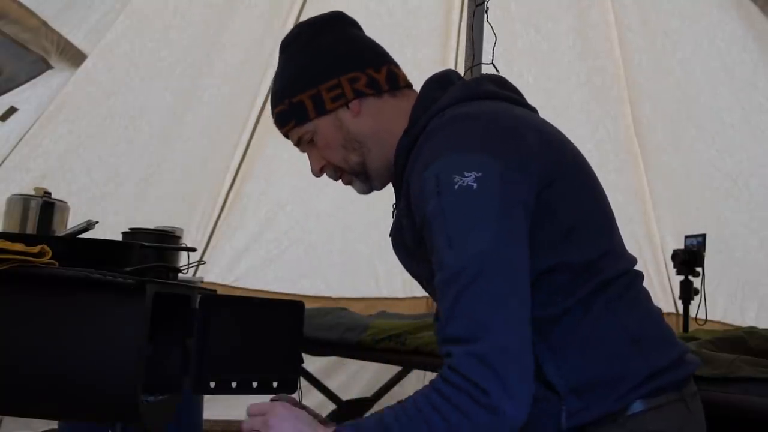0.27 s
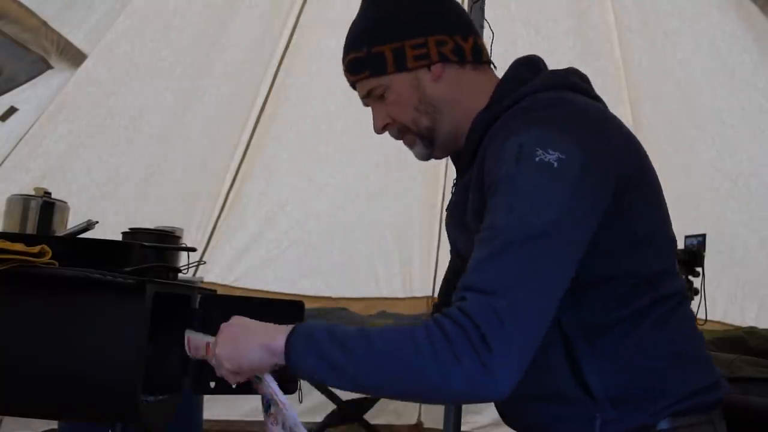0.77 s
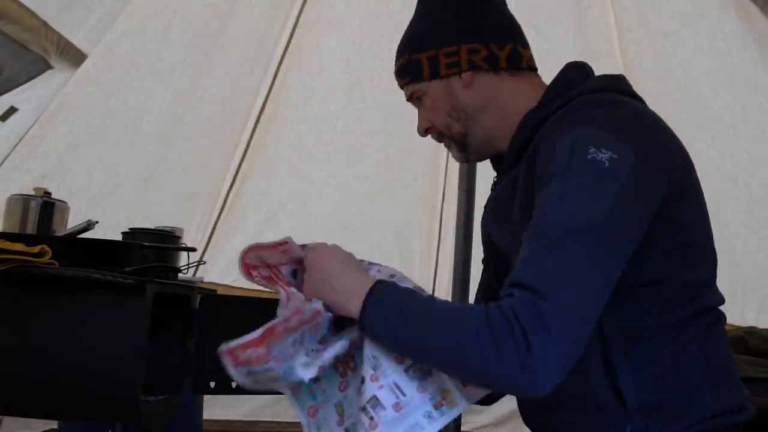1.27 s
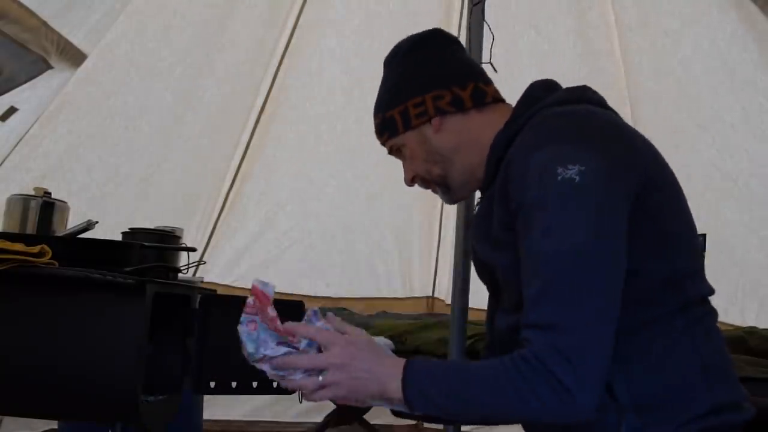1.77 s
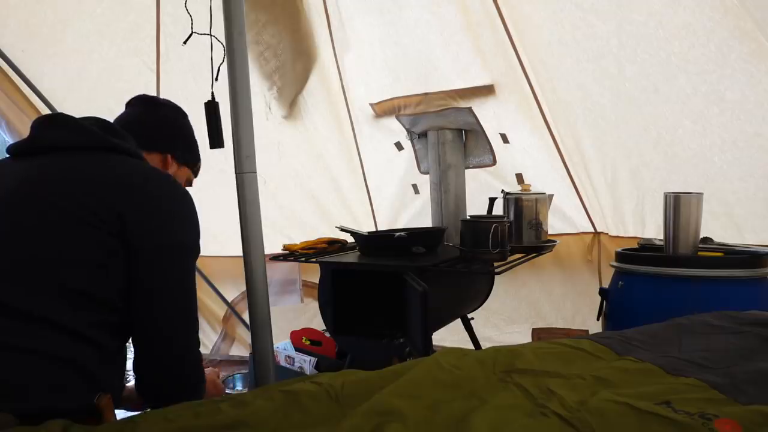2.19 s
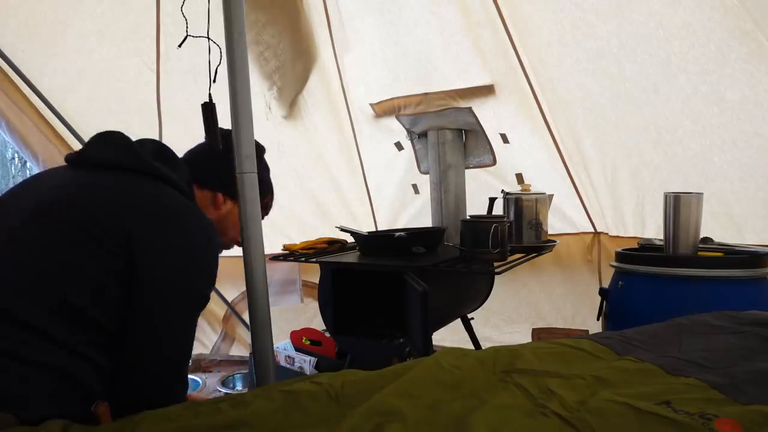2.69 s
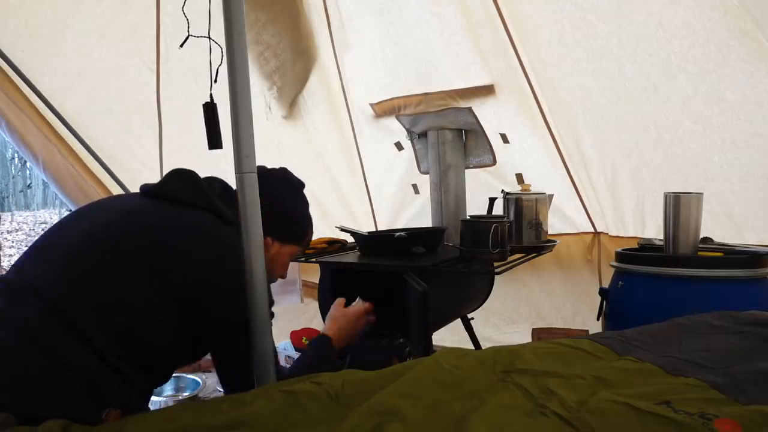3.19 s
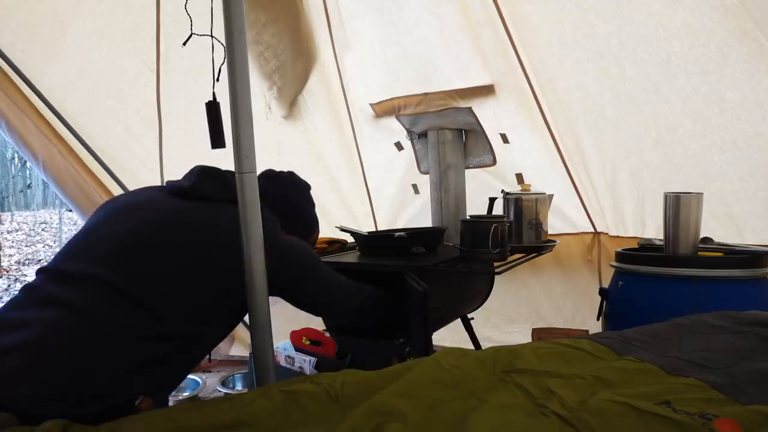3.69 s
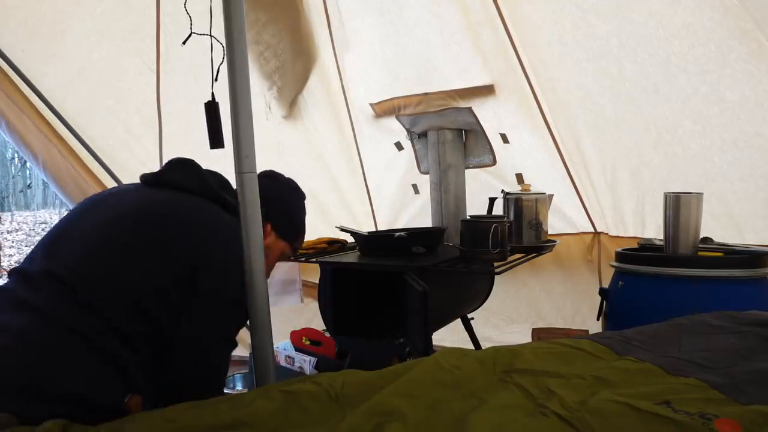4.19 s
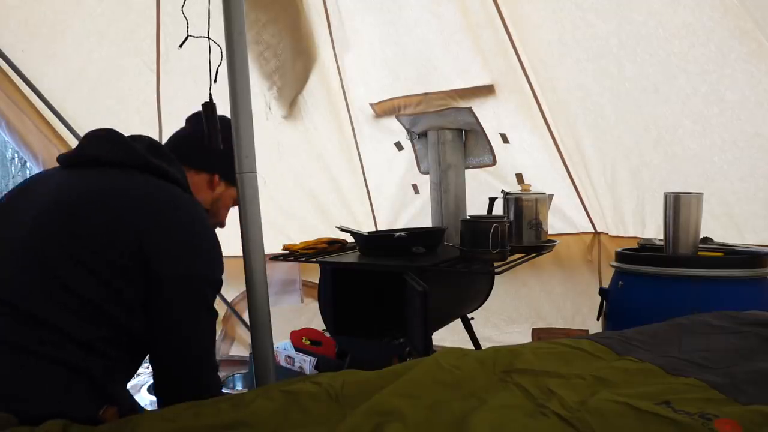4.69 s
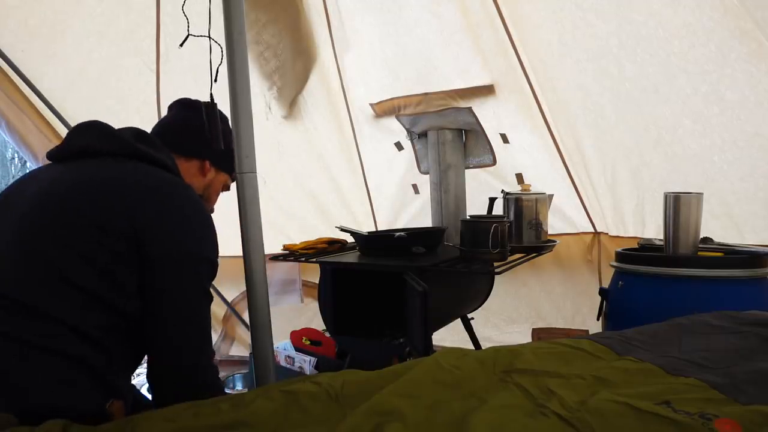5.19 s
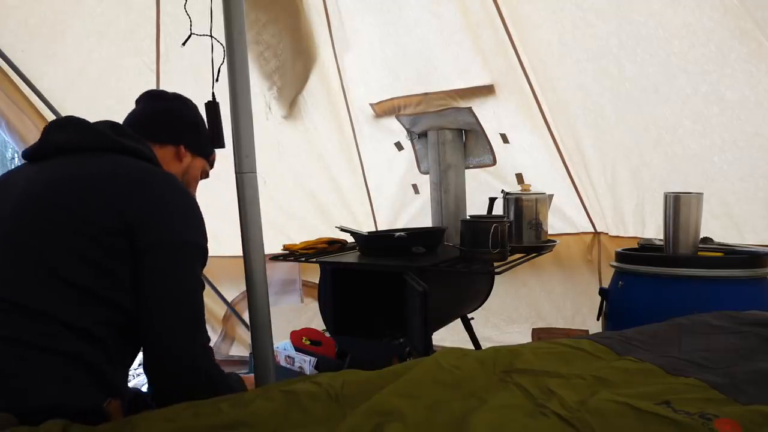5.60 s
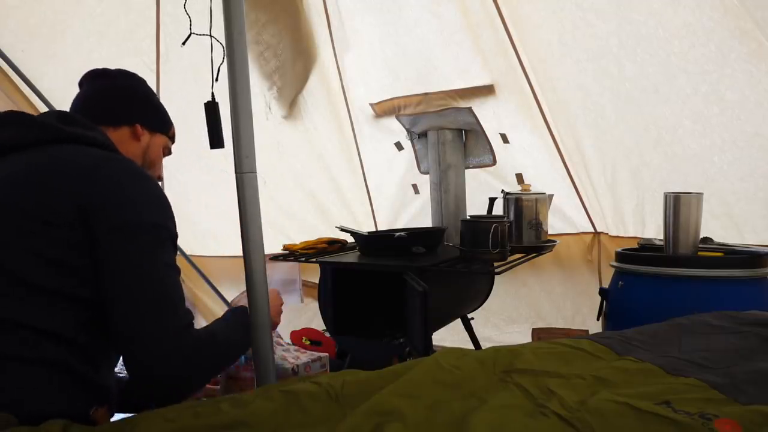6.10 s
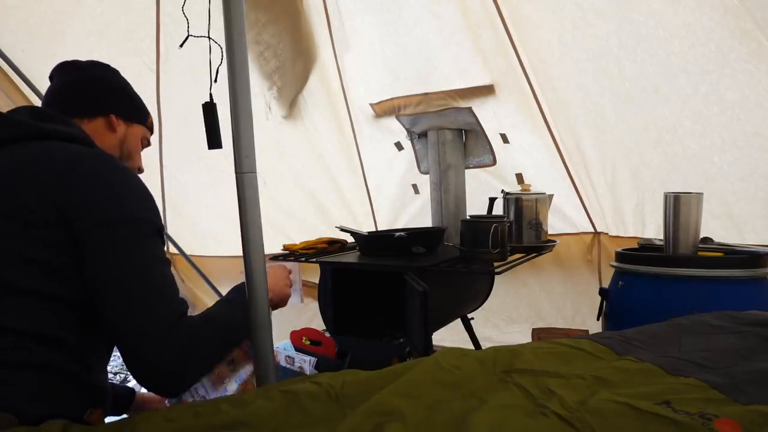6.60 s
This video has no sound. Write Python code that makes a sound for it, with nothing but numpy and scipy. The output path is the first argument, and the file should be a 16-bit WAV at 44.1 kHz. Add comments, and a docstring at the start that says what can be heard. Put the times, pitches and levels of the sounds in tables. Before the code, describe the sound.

Inside a canvas tent, newspaper is picked up and scrunched into a ball, crackling and snapping in quick squeezes while sleeves brush by. After about three seconds it drops to softer crinkling as the paper is pushed into a stove. Near the end a strip is quietly torn off. A low rumble runs underneath, and the close microphone is heard almost only on the left.

```python
"""Inside a canvas tent, newspaper is picked up, crumpled into a ball and pushed into a small stove.
Creases crackle and snap as they give way, folds crunch, loose panels pop and trapped air puffs out.
Then a strip is torn off, its fibres parting with a hiss. Sleeves brush by over a steady low rumble.
A close microphone feeds the left channel; the right one is almost silent."""
import sys
import numpy as np
from scipy import signal
from scipy.io import wavfile
from scipy.ndimage import uniform_filter1d, minimum_filter1d

SR = 44100
rng = np.random.default_rng(int(sys.argv[2]) if len(sys.argv) > 2 else 0)


def wav_out(sig):
    """Save sig, one row per channel (or a flat mono array), as 16-bit PCM at SR to the path in sys.argv[1]."""
    wavfile.write(sys.argv[1], SR, np.round(np.clip(np.atleast_2d(sig).T, -1, 1) * 32767).astype(np.int16))


N = 302085
TIME = np.arange(N) / SR


# The tone of newspaper, from low to high: frequency_hz, level_db
PAPER_TONE = [(150, -14.5), (330, -17), (650, -9.5), (1050, -7), (1900, -7.5), (2700, -5.5), (3450, -1.5),
              (3950, -5), (4400, -9.5), (5300, -13), (8300, -16), (10300, -21), (13500, -21),
              (16000, -29.5)]

def crumpling(pocket_hz=1035, drift=0.023, pocket_db=-3, panel_db=-3, top_db=0.1, gain_db=-1.06):
    """Creases give way in little flurries; broad panels add dull crunches, tiny creases bright ticks."""
    flurries = np.sqrt(1.5 + fading_power(random_clicks(per_s=90, spread_db=2), decay_s=.014))
    creases = colour(flurries * crackle(per_s=2000, spread_db=3.2, ring_s=.0012, rub_db=0), PAPER_TONE)
    creases += .6 * resonate(creases, facet_pitch(), width_hz=260)
    panels = colour(flurries * crackle(per_s=320, spread_db=6, ring_s=.0061, rub_db=-.5), PAPER_TONE)
    ticks = colour(crackle(per_s=330, spread_db=5.3, ring_s=.002, rub_db=-2), PAPER_TONE)
    # A pocket of air in the folded paper rings at a drifting pitch.
    wander = unit(uniform_filter1d(rng.standard_normal(N), size=12000))
    pocket = resonate(creases, pocket_hz * np.exp(drift * wander), width_hz=260)
    body, middle, top = three_bands(creases + amp(pocket_db) * pocket)
    body += amp(panel_db) * three_bands(panels)[0]
    top += three_bands(ticks)[2]
    bands = [steadied(body), steadied(middle), amp(top_db) * steadied(top)]
    return amp(gain_db) * (squeezing() * bands).sum(0)


def facet_pitch(per_s=45, low_hz=900, high_hz=4200):
    """One small flat patch of paper after another takes the strain, each with its own pitch."""
    pitches_hz = low_hz * (high_hz / low_hz) ** rng.random(2000)
    return pitches_hz[(TIME * per_s).astype(int)]


# Each squeeze or push; body (lows) and crisp (highs) are relative to its level:
# full_force_s, build_s, hold_s, level_db, body_db, crisp_db
SQUEEZES = [(0.0, .02, 0.051, -28, -6, -12.5), (0.12, .04, 0.067, -38, -4.5, -11.5),
            (0.337, 0.1, 0.023, -35, -1, -10), (0.45, 0.084, 0.064, -27, -4.5, -12),
            (0.587, 0.027, 0.053, -28, -8, -9.5), (0.694, 0.049, 0.021, -27.5, -8, -8.5),
            (0.78, 0.15, 0.047, -26.5, -9.5, -16.5), (0.881, .04, 0.058, -25, -11.5, -7.5),
            (0.99, .05, 0.062, -30, -9, -12), (1.123, 0.011, 0.14, -26.5, -7, -9.5),
            (1.213, 0.19, 0.14, -24.5, -9.5, -11.5), (1.374, 0.093, 0.41, -25.5, -7, -10.5),
            (1.69, 0.11, 0.37, -25.5, -6.5, -8.5), (2.118, 0.014, 0.1, -26.5, -12, -8),
            (2.243, 0.089, 0.13, -30, -8.5, -7.5), (2.401, .012, 0.023, -30.5, -9, -8.5),
            (2.479, 0.096, 0.076, -30, -5.5, -7), (2.599, 0.084, 0.087, -32, -9, -8.5),
            (2.744, 0.076, 0.18, -38, -13, -8), (2.981, 0.071, 0.013, -36, -12.5, -8.5),
            (3.146, 0.12, 0.08, -40.5, -10, -8.5), (3.28, 0.065, 0.11, -45, -9.5, -9),
            (3.44, 0.067, 0.18, -43.5, -8.5, -7.5), (3.727, 0.038, 0.075, -43, -8.5, -10),
            (3.934, 0.16, 0.17, -42.5, -9, -11.5), (4.202, 0.061, 0.018, -44, -13, -3.5),
            (4.469, 0.031, .15, -43.5, -7.5, -6), (4.776, 0.14, .11, -45.5, -8, -7),
            (4.92, .012, 0.032, -38.5, -30, -11.5), (5.08, .08, 0.21, -53, -4, -9),
            (5.294, 0.055, 0.056, -46, -8, -6), (5.52, .08, 0.015, -51.5, -14, -4.5),
            (6.66, 0.028, 0.18, -54, -3, -8)]

def squeezing(crisp_power=1.03):
    """The strongest squeeze of the moment sets how loud the paper's lows, middle and highs are."""
    gains = np.zeros((3, N))
    for full_s, build_s, hold_s, level_db, body_db, crisp_db in SQUEEZES:
        force = effort(full_s, build_s, hold_s)
        bands = np.array([amp(body_db) * force, force, amp(crisp_db) * force ** crisp_power])
        gains = np.maximum(gains, amp(level_db) * bands)
    return gains


def effort(full_s, build_s, hold_s, tire_db_per_s=6.5, release_db_per_s=240, settle_db_per_s=60):
    """A hand presses ten times harder every build_s, tires a little and lets go; the paper settles."""
    rise = 10 ** np.clip((TIME - full_s) / build_s, -10, 0)
    held_s = np.clip(TIME - full_s, 0, hold_s)
    after_s = np.maximum(TIME - full_s - hold_s, 0)
    settle = amp(-14.5)  # the share of the sound that lingers
    release = (1 - settle) * amp(-release_db_per_s * after_s) + settle * amp(-settle_db_per_s * after_s)
    return rise * amp(-tire_db_per_s * held_s) * release


# The largest creases snapping: start_s, level_db, crisp_db
SNAPS = [(0.113, -19.5, -26), (0.1773, -18.5, -11), (0.251, -25.5, -24), (0.286, -23.5, -16),
         (0.499, -4.5, -8.5), (0.5408, -9.5, -14), (0.5696, -8, -26), (0.612, -10, -16),
         (0.6493, -8.5, -15), (0.8983, -18, -12), (0.9367, -18.5, -7), (1.1201, -8.5, -10.5),
         (1.7157, -12, -10), (2.1251, -6, -14), (2.39, -8, -10), (2.8661, -18, -15.5), (2.9792, -25, -29),
         (2.9958, -13, -17), (3.4403, -25, -18), (3.6537, -27, -22), (3.787, -24, -31),
         (3.8691, -28.5, -13), (3.999, -24.5, -30), (4.018, -25, -18), (4.129, -27.5, -24),
         (4.2033, -23, -13), (4.33, -34, -29), (4.4665, -28, -18), (4.846, -25.5, -12), (4.8825, -24, -15),
         (4.9144, -23, -30), (4.9527, -15.5, -5.5), (5.0535, -32.5, 2), (5.0788, -28, -17),
         (5.332, -20, -11.5)]

def snaps(crack_s=0.0014, crunch_s=0.039, crunch_db=-17, crisp_lift_db=7, size=4000):
    """A large crease gives way with one sharp crack and sets off a short crunch of smaller ones."""
    out, t, lead = np.zeros(N), np.arange(size) / SR, size // 30
    for start_s, level_db, crisp_db in SNAPS:
        fade = np.exp(-t / crack_s) + amp(crunch_db) * np.exp(-t / crunch_s)
        burst = rng.standard_normal(size) * fade
        burst[0] += 3  # the sharp first click
        crack = colour(np.pad(burst, (lead, 0)), PAPER_TONE)
        crack = balance(crack, body_db=-10.5, crisp_db=crisp_db + crisp_lift_db)
        add(out, start_s - lead / SR, crack, level_db)
    return out


# Fingers closing on a fold: middle_s, level_db, half_length_s, pitch_hz
CRUNCHES = [(0.066, -35, 0.012, 1670), (0.599, -24.5, 0.022, 1250), (1.427, -33, 0.016, 1140),
            (1.512, -30.5, 0.016, 1280), (1.963, -31.5, 0.033, 1050), (2.996, -39.5, 0.0074, 1210),
            (3.167, -40.5, 0.016, 1050), (3.227, -41, 0.0087, 1050), (3.601, -47.5, 0.017, 1000),
            (4.557, -47.5, 0.057, 1460), (4.917, -45, 0.039, 1600), (6.775, -45, .018, 950)]

def crunches(width_hz=520):
    """Coarse crackle swells and fades, and the air inside the fold makes it sound hollow."""
    out = np.zeros(N)
    creases = crackle(per_s=1500, spread_db=5, ring_s=.003, rub_db=-27)
    for middle_s, level_db, half_s, pitch_hz in CRUNCHES:
        near = abs(TIME - middle_s) < 3 * half_s
        pitch = np.full(near.sum(), pitch_hz)
        hollow = resonate(resonate(creases[near], pitch, width_hz), pitch, 3 * width_hz)
        out[near] += amp(level_db) * unit(hollow) * swell(middle_s, half_s)[near]
    return out


# Whole panels of the sheet buckling: start_s, level_db, pitch_hz
POPS = [(0.342, -21.5, 734), (0.599, -21.5, 1540), (0.939, -21, 1110), (1.3, -18.5, 810),
        (3.921, -31, 1220), (5.119, -31.5, 900), (5.134, -29, 1000), (5.198, -34.5, 1250),
        (6.543, -27, 890), (6.639, -35.5, 750), (6.769, -32, 930)]

def pops(ring_s=0.0039, flutter_s=0.019, flutter_db=-5, gain_db=-2):
    """A loose panel flips over with a very short note and a dull flutter."""
    out, t = np.zeros(N), np.arange(SR // 15) / SR
    flutter_tone = [(150, -10), (500, 20), (1400, 24.5), (2300, 10.5), (9000, -78)]
    for start_s, level_db, pitch_hz in POPS:
        flutter = colour(rng.standard_normal(len(t)) * np.exp(-t / flutter_s), flutter_tone)
        note = -np.sin(2 * np.pi * pitch_hz * t) * np.exp(-t / ring_s)
        pop = note + amp(flutter_db) * flutter / abs(flutter).max()
        add(out, start_s, pop, level_db + gain_db)
    return out


# Palms pressing the paper flat: start_s, level_db
PRESSES = [(0.343, -40), (1.229, -24.5), (1.298, -25), (2.132, -33.5)]
# The tone of the escaping air: frequency_hz, level_db
PUFF_TONE = [(70, -32), (160, 4), (290, 0.5), (520, -8), (900, -31), (3000, -67)]

def puffs(decay_s=0.013, gain_db=-1):
    """Air squeezed out from between the sheets gives a soft, low thump."""
    out, t = np.zeros(N), np.arange(SR // 15) / SR
    for start_s, level_db in PRESSES:
        puff = colour(rng.standard_normal(len(t)) * np.exp(-t / decay_s), PUFF_TONE)
        add(out, start_s, puff, level_db + gain_db)
    return out


# Each pull on the strip: middle_s, half_length_s, rasp_db, ring_db
PULLS = [(5.52, 0.075, -61, -57), (5.863, 0.094, -53, -60), (6.39, 0.21, -53.5, -58.5),
         (6.773, 0.025, -48, -71)]
# The tone of parting fibres: frequency_hz, level_db
FIBRE_TONE = [(120, -26), (200, 4), (294, -16), (491, -14), (612, 0.5), (933, -8.5), (1590, -10.5),
              (1870, -15.5), (2170, -12.5), (2420, -15), (2960, -14), (4200, -23.5), (16000, -40)]

def tearing(start_s=5.42, first_hz=3530, last_hz=2610, grow_s=0.53, slide_db=-61.5, slide_build_s=.1):
    """Fibres part in a fine rasp, and the hollow under the strip rings ever lower as it grows."""
    torn_s = np.maximum(TIME - start_s, 0)
    ring_hz = last_hz + (first_hz - last_hz) * np.exp(-torn_s / grow_s)
    fibres = crackle(per_s=3000, spread_db=3.5, ring_s=.0019, rub_db=-1)
    echo = np.interp(TIME - 6.8 / ring_hz, TIME, fibres)  # off the sheet, 6.8 ring cycles later
    rasp = balance(colour(fibres + .4 * echo, FIBRE_TONE), body_db=0, crisp_db=-13)
    ring = unit(resonate(resonate(fibres, ring_hz, width_hz=150), ring_hz, width_hz=500))
    rasp_gain = sum(amp(rasp_db) * swell(s, half_s) for s, half_s, rasp_db, _ in PULLS)
    ring_gain = sum(amp(ring_db) * swell(s, half_s) for s, half_s, _, ring_db in PULLS)
    slide_gain = amp(slide_db) * np.minimum(torn_s / slide_build_s, 1)  # the strip slides between pulls
    return np.maximum(rasp_gain, slide_gain) * rasp + ring_gain * ring


# Sweeps of the arm: full_force_s, hold_s, level_db
ARM_SWEEPS = [(0.0, 0.11, -41), (0.314, 0.14, -38.5), (0.474, 0.67, -45), (1.182, 0.96, -44),
              (2.12, .5, -53.5)]
# The tone of rubbing cloth: frequency_hz, level_db
CLOTH_TONE = [(40, 2.5), (110, 3.5), (160, -8), (260, 0), (450, -6.5), (900, -84.5)]

def sleeves(build_s=0.05):
    """A sleeve brushes near the microphone as the arm moves."""
    gain = sum(amp(level_db) * effort(s, build_s, hold_s) for s, hold_s, level_db in ARM_SWEEPS)
    return gain * noise(CLOTH_TONE)


# The tone of the rumble: frequency_hz, level_db
RUMBLE_TONE = [(12, -55), (20, 3.5), (37, 3), (60, 3), (119, -3), (177, -15), (208, -15), (233, -21),
               (400, -26.5), (520, -47), (880, -120)]
# How loud the rumble is: time_s, level_db
RUMBLE_LEVEL = [(0.0, -36), (2.0, -47), (4.4, -42.5), (6.85, -39.5)]

def rumble():
    """A low rumble slowly sinks and comes partway back."""
    times_s, levels_db = np.transpose(RUMBLE_LEVEL)
    return amp(np.interp(TIME, times_s, levels_db)) * noise(RUMBLE_TONE)


# The tone of the air: frequency_hz, level_db
AIR_TONE = [(150, -20), (250, -27), (380, -37), (444, -8), (484, -16.5), (1200, -11.5), (2810, -37),
            (3340, -17), (4990, -34), (16000, -36.5)]

def air(level_db=-56):
    """A faint, even hush lies behind everything."""
    return amp(level_db) * noise(AIR_TONE)


# How long the tent's echo takes to fade by 60 dB: frequency_hz, fade_s
TENT_FADE = [(200, 0.16), (1000, 0.04), (4000, 0.11), (15000, 0.025)]

def tent(x, echo_db, size=SR // 4):
    """Sound bounces off the canvas, adding a short tail of scattered echoes."""
    bounces = rng.choice([-1., 1.], size) * (rng.random(size) < 3000 / SR)
    bounces *= np.arange(size) > .003 * SR  # nothing comes back in the first 3 ms
    hz, t, spectrum = signal.stft(bounces, SR, nperseg=256)
    fade = amp(-60 * t / look_up(TENT_FADE, hz)[:, None])
    tail = signal.istft(spectrum * fade, SR, nperseg=256)[1]
    return x + amp(echo_db) * signal.oaconvolve(x, tail / np.linalg.norm(tail))[:N]


# How much sound leaks into the right channel: frequency_hz, gain_db
LEAK = [(60, -44), (400, -53), (1300, -55), (4400, -50), (15000, -28)]

def right_channel(left):
    """A faint, blurred trace of the left channel leaks through, along with hiss."""
    trace = colour(unit(tent(left, echo_db=18)) * left.std(), LEAK)
    hiss_gain = amp(np.interp(TIME, [3, 5.5], [-72, -69]))
    return trace + hiss_gain * noise([(50, -14), (400, -5.5), (2000, -7.5), (15000, -12)])


def crackle(per_s, spread_db, ring_s, rub_db):
    """Creases click and the paper beside them rings briefly, over the hiss of paper rubbing on paper."""
    clicks = random_clicks(per_s, spread_db)
    hiss_gain = np.sqrt(2 * fading_power(clicks, ring_s) + amp(rub_db) ** 2)
    return unit(clicks + hiss_gain * rng.standard_normal(N))


def random_clicks(per_s, spread_db):
    """Clicks at random moments, many small and a few large."""
    sizes = amp(spread_db * np.minimum(rng.exponential(1, N), 4)) * rng.choice([-1, 1], N)
    return unit(sizes * (rng.random(N) < per_s / SR))


def fading_power(clicks, decay_s):
    """Power that jumps at each click and then dies away."""
    keep = np.exp(-2 / (decay_s * SR))
    return signal.lfilter([1 - keep], [1, -keep], clicks ** 2)


def resonate(x, hz, width_hz):
    """Makes a sound ring around a pitch that can move."""
    turn = np.exp(2j * np.pi * np.cumsum(hz) / SR)
    keep = np.exp(-np.pi * width_hz / SR)
    return 2 * (turn * signal.lfilter([1 - keep], [1, -keep], x / turn)).real


def three_bands(x, splits_hz=(1400, 5000)):
    """Splits a sound into low body, middle and crisp top, each at level 1."""
    filters = [signal.butter(4, hz, fs=SR, output="sos") for hz in splits_hz]
    body, below_top = (signal.sosfiltfilt(sos, x, padtype=None) for sos in filters)
    return unit(body), unit(below_top - body), unit(x - below_top)


def balance(x, body_db, crisp_db):
    """Big panels add body; small stiff creases add crispness."""
    body, middle, top = three_bands(x)
    return amp(body_db) * body + middle + amp(crisp_db) * top


def colour(x, tone, size=4096):
    """Gives a sound a tone (rows of frequency_hz, level_db) while clicks keep their sharp start."""
    hz = abs(np.fft.fftfreq(size, 1 / SR))
    log_gain = np.log(amp(np.maximum(look_up(tone, hz), -100)))
    taps = np.fft.ifft(np.exp(np.conj(signal.hilbert(log_gain)))).real
    return signal.oaconvolve(x, taps[:size // 2])[:len(x)]


def noise(tone):
    """Noise with the given tone, at level 1."""
    return unit(colour(rng.standard_normal(N), tone))


def look_up(table, hz):
    """Reads a table at the given frequencies."""
    table_hz, values = np.transpose(table)
    return np.interp(np.log(hz + 1), np.log(table_hz + 1), values)


def swell(middle_s, half_s):
    """A smooth rise and fall."""
    return np.exp(-((TIME - middle_s) / half_s) ** 2 / 2)


def steadied(x, size=2200):
    """Evens out slow changes in level and keeps the fine crackle."""
    return x / np.sqrt(abs(uniform_filter1d(x ** 2, size)) + 1e-9)


def add(mix, start_s, sound, peak_db):
    """Mixes a sound in at the given time and peak level."""
    part = mix[max(round(start_s * SR), 0):][:len(sound)]
    part += amp(peak_db) * sound[:len(part)] / abs(sound).max()


def amp(db):
    """Turns decibels into a multiplier."""
    return 10 ** (np.asarray(db) / 20)


def unit(x):
    """Scales a sound to an average (rms) level of 1."""
    return x / np.sqrt(np.mean(x ** 2) + 1e-20)


def scene():
    """Everything reaches the left channel; the right holds only a faint trace and hiss."""
    paper = tent(crumpling() + snaps() + crunches(), echo_db=-15)
    paper += tent(pops(), echo_db=-4.5)
    left = 2 * (paper + puffs() + tearing() + rumble() + sleeves() + air())
    return np.array([left, right_channel(left)])


def record(dry, ceiling_db=-5, size=130, cutoff_hz=16150):
    """Turns the hardest cracks down for an instant, then cuts off the very highest treble."""
    allowed_gain = np.minimum(1, amp(ceiling_db) / (abs(dry).max(0) + 1e-9))
    limited = dry * uniform_filter1d(minimum_filter1d(allowed_gain, size), size)
    treble_cut = signal.firwin(511, cutoff_hz, window=("kaiser", 9), fs=SR)
    return signal.oaconvolve(limited, treble_cut[None], "same")


dry = scene()
out = record(dry)
wav_out(out)
```